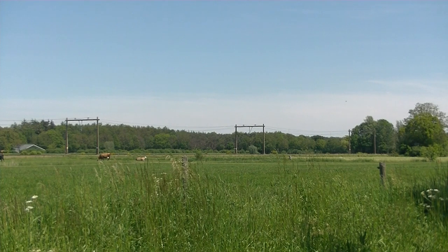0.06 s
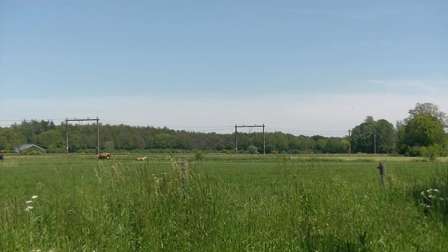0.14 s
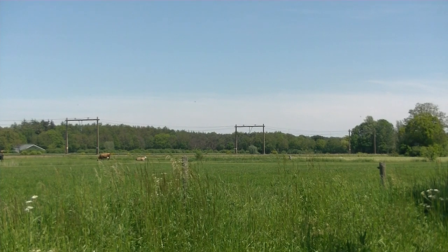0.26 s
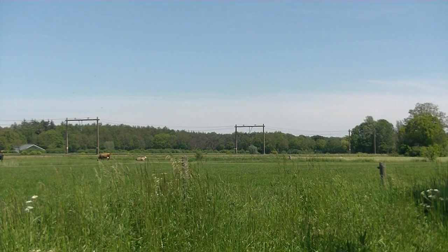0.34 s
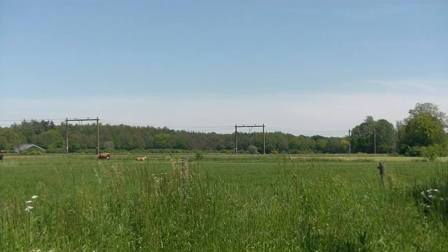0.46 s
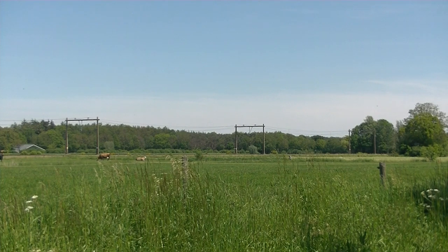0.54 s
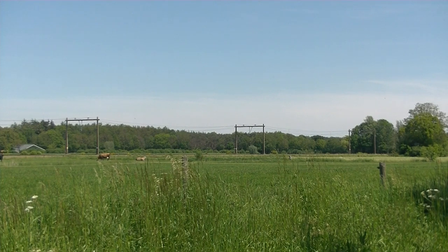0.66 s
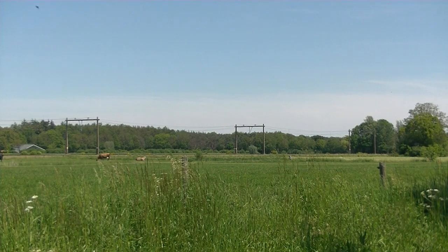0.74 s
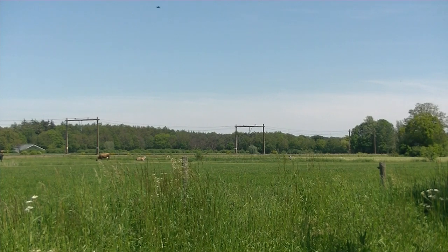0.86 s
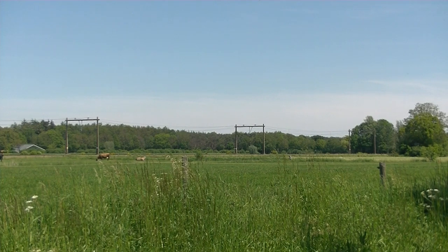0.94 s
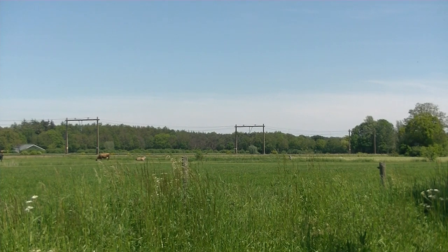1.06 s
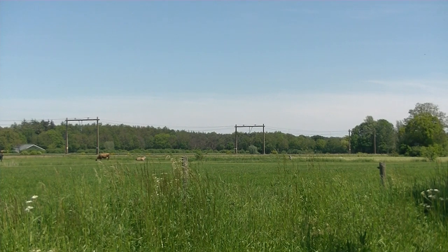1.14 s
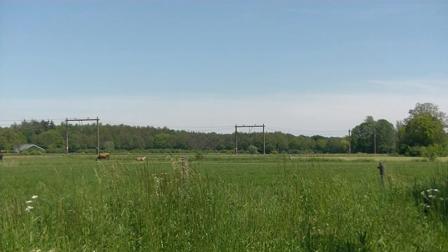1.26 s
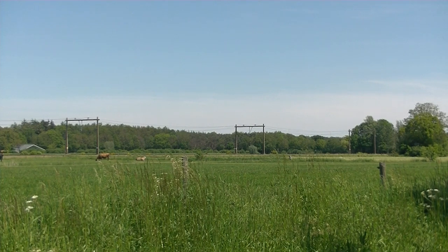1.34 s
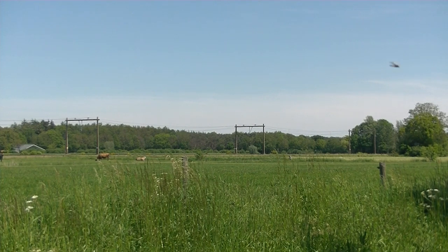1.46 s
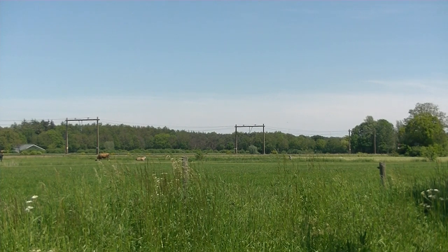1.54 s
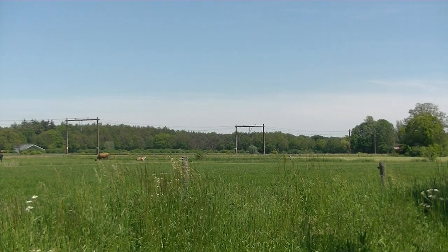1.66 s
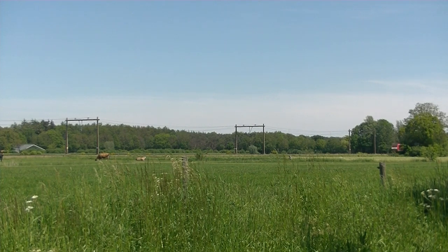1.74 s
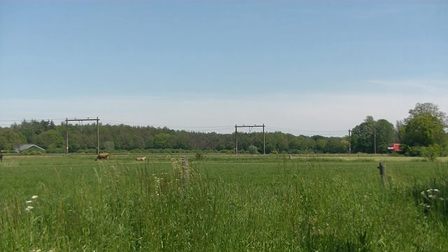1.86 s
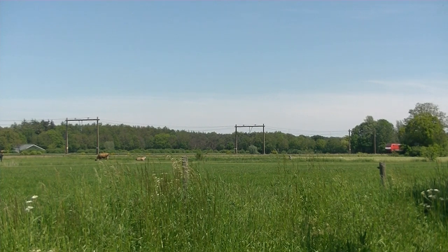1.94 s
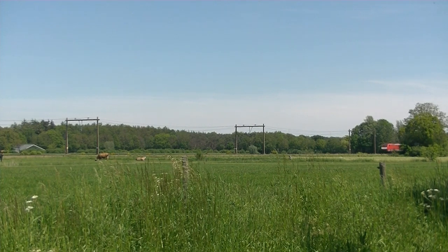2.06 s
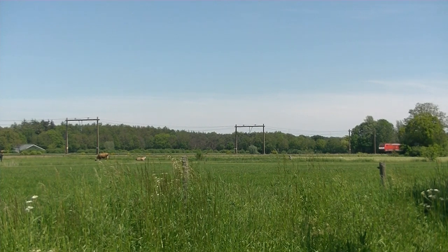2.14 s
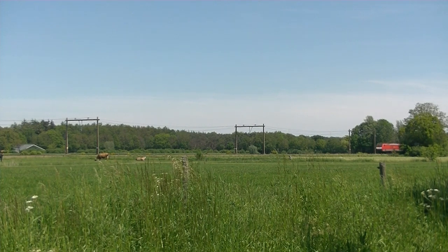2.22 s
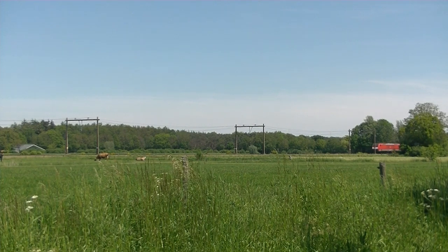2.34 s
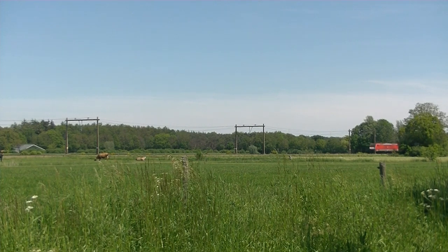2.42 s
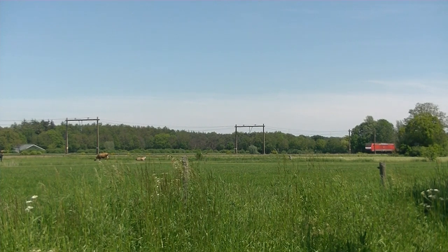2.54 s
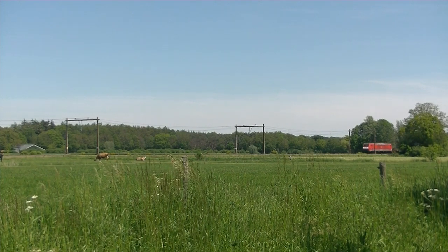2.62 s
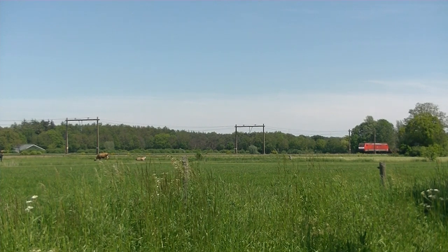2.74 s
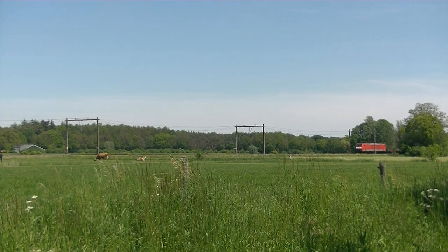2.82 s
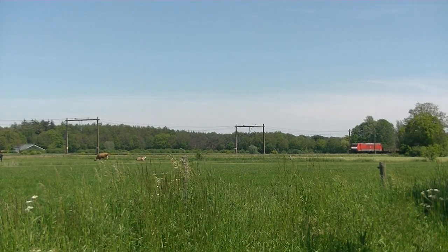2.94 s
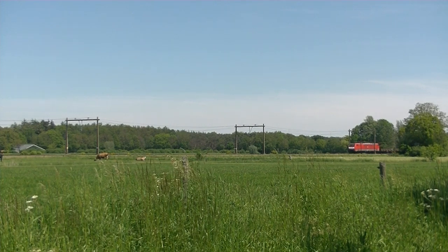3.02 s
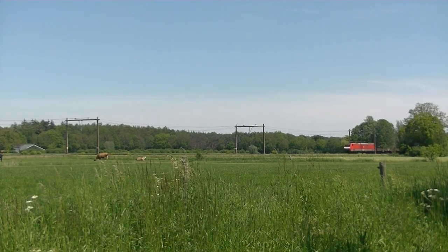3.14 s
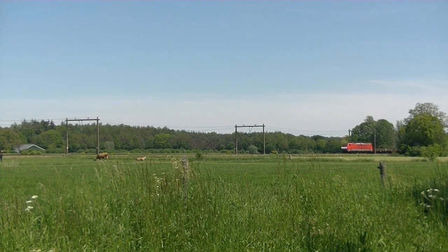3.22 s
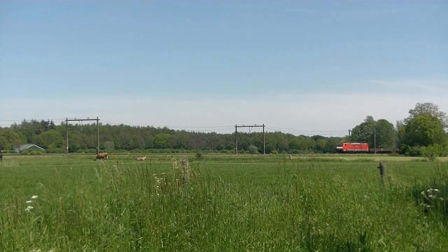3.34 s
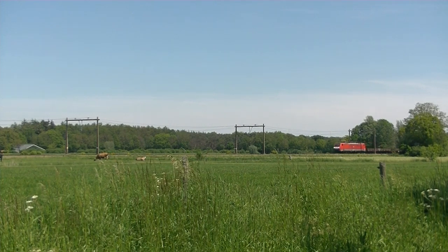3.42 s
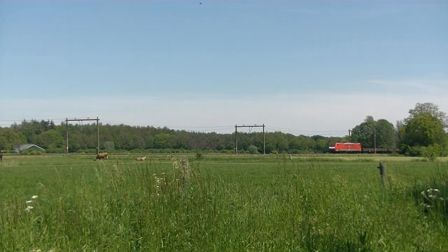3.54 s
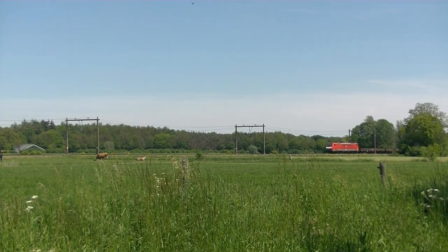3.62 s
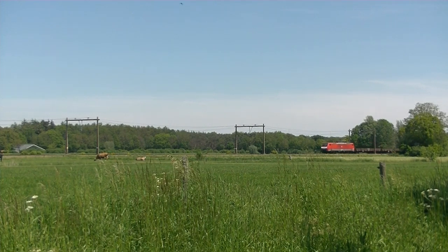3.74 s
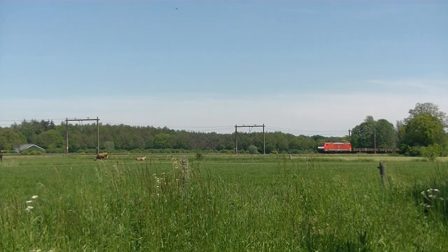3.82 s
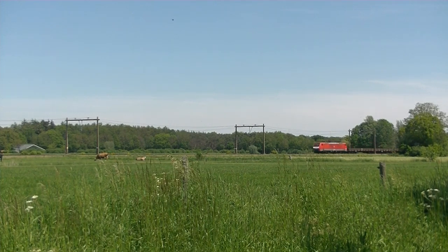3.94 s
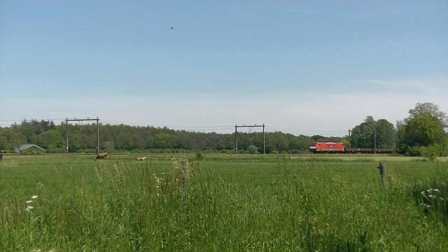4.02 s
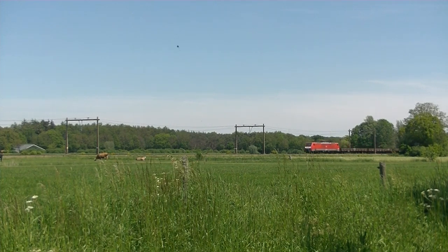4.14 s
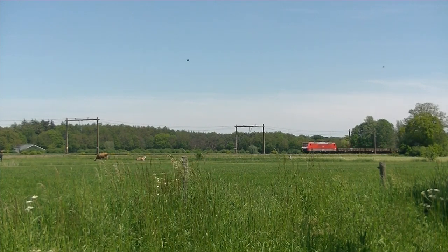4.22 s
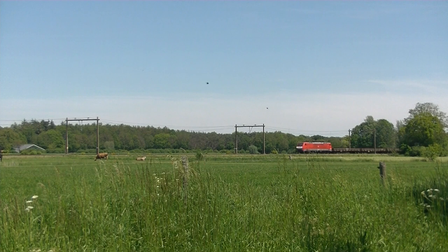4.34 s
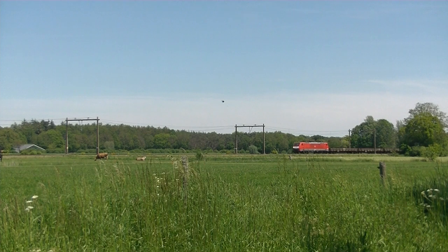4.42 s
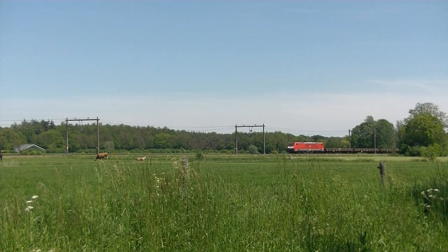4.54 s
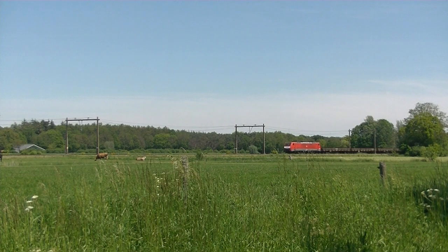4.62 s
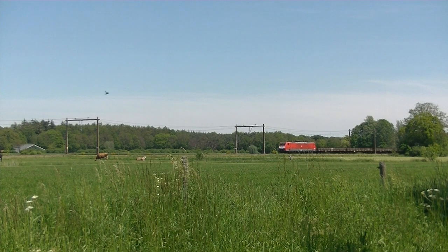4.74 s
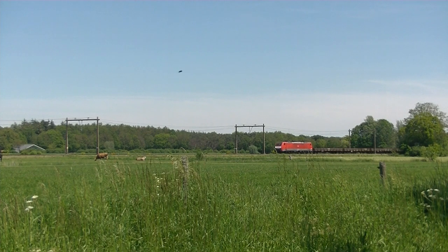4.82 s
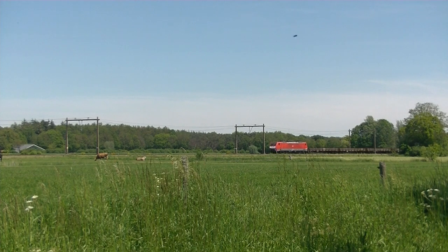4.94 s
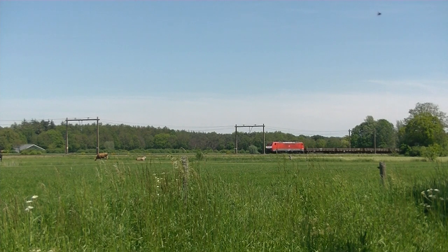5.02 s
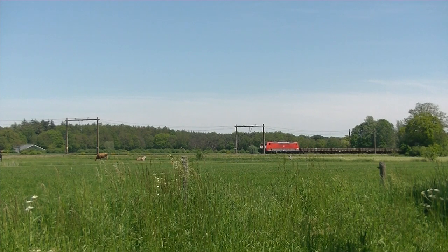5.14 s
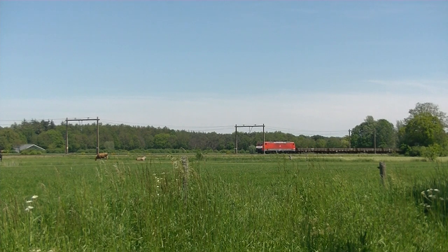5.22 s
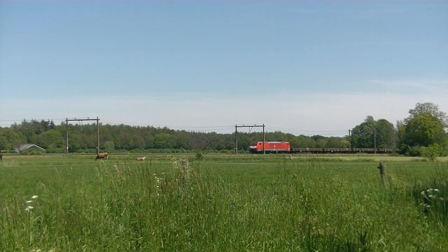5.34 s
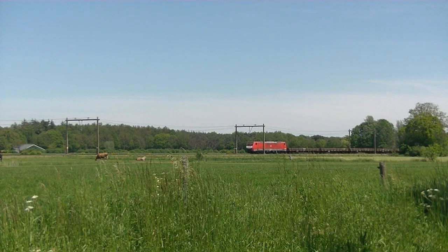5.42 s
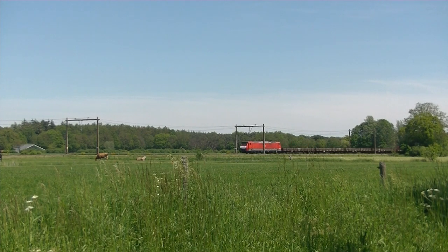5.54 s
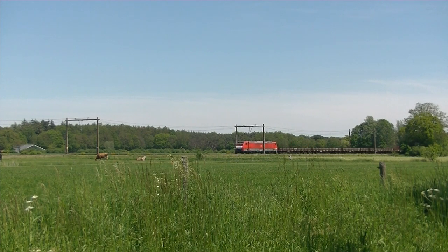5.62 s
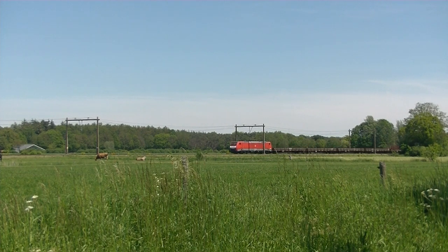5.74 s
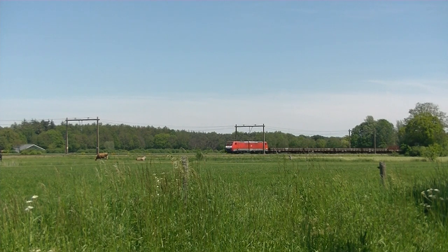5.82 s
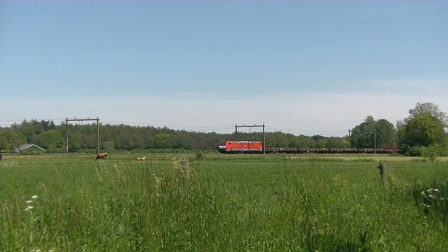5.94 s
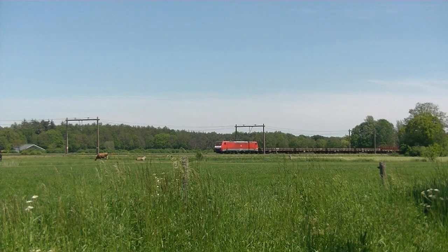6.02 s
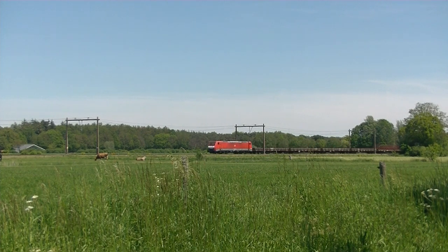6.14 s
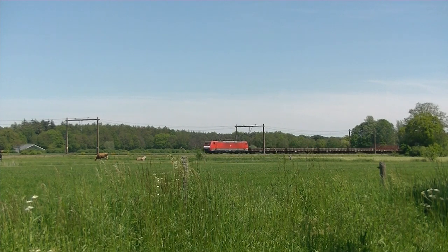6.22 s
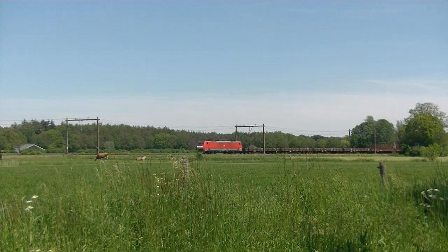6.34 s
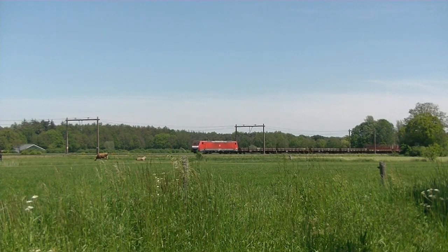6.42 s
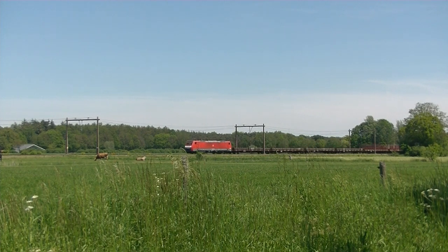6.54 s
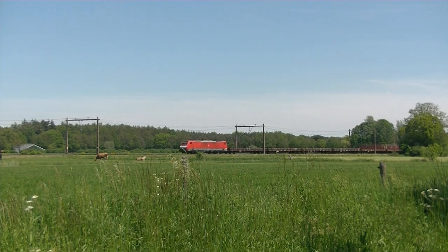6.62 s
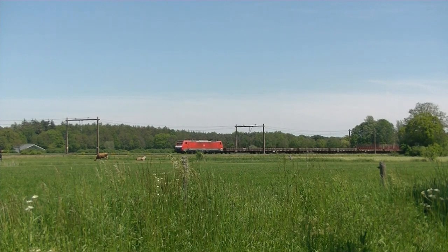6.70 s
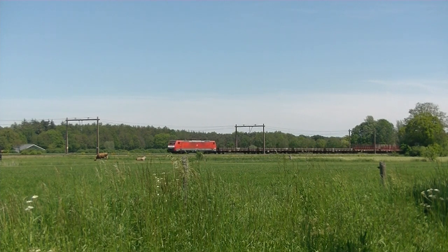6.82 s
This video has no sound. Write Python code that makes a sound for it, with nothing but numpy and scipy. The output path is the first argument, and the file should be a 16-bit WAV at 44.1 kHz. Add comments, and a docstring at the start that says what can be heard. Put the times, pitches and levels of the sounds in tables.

```python
"""The whole scene fades in slowly, from almost nothing at the start to nearly full level at the end.
From the start a freight train rolls past far across a meadow: many steel wheels ring on rough rail, made as
one rush of shaped noise that the air makes waver, with brief squeaks, over a low rumble and faint hiss.
Close by, a camera shutter is released four times, at about 0.9, 1.8, 2.0 and 4.0 s: small blows and a patter
of gear teeth ring the camera body."""
import sys
import numpy as np
from scipy import signal
from scipy.io import wavfile
from scipy.ndimage import uniform_filter1d

SR = 44100
rng = np.random.default_rng(int(sys.argv[2]) if len(sys.argv) > 2 else 0)


def digitize_waveform(pressure):
    """Quantize a signal to 16-bit integers and store it at the path in sys.argv[1].

    Rows of a 2-D input are taken as channels; values are limited to [-1, 1].
    """
    field = np.atleast_2d(pressure).T
    bounded = np.clip(field, -1, 1)
    quanta = np.round(bounded * 32767).astype(np.int16)
    wavfile.write(sys.argv[1], SR, quanta)


N = 302967  # length in samples

# Low rumble and faint hiss. Each row: frequency in Hz, level in dB per Hz before the fade-in.
MEADOW_SPECTRUM = [(25, -114), (34, -110), (42, -102), (60, -101), (110, -91.5), (190, -86.5), (350, -85),
                   (700, -97.5), (3000, -100), (7000, -104), (9000, -107), (14800, -111), (15200, -118),
                   (15450, -135), (20000, -140)]
# The low roll under the rush, strongest at first, while the trees still screen the wheels.
# Each row: time in seconds, gain in dB below the low knee.
LOW_ROLL = [(0, 6), (.3, 3.5), (.7, 3), (1.2, 1.5), (2, 0), (3, -1), (4, -0.5), (5, 1.5), (6, -1.5),
            (6.9, 1)]

# How alike the two microphone ports hear the noise. Each row: frequency in Hz, likeness (1 = the same).
PORT_LIKENESS = [(60, 0.76), (150, 0.48), (380, 0.62), (950, 0.9), (2400, .96), (3500, 0.96), (4500, 1),
                 (5600, 0.94), (7000, 0.91), (9000, 0.99), (15000, 0.93)]
# Balance of the ports. Each row: frequency in Hz, left minus right in dB.
PORT_BALANCE = [(60, -1), (150, -3), (380, -4), (950, 0.5), (2380, 1), (5970, -1), (15000, 3.5)]
# Phase between the ports. Each row: frequency in Hz, lead of the left port in radians.
PORT_LEAD = [(60, 0.15), (340, 0.19), (1030, 0.34), (2670, 0.01), (6000, 0.1)]

# Ways the camera body rings. Each row: frequency in Hz, relative level in dB, time to fall 60 dB in seconds.
BODY_RINGS = [(2960, 12, .004), (3700, 6, .004), (5000, 1, .004), (6640, -3, .005), (7030, 1, .0055),
              (7700, 0, .006), (8250, 4, .0065), (8900, 0, .006), (10400, -3, .006), (11500, -12, .004),
              (13500, -20, .004)]
# Parts of the camera striking their stops. Each row: time in seconds, strength in dB before the body rings.
STOP_TICKS = [(.7012, -46), (.8012, -50), (.8028, -47), (.8052, -47), (.8162, -39.5), (.8188, -44),
              (.8298, -55), (0.8628, -35.5), (.8636, -41), (.8780, -51), (.8955, -43), (.8995, -44),
              (.9028, -51), (.9049, -47), (.9250, -51), (.9436, -54), (1.7330, -49), (1.7372, -41),
              (1.7484, -40), (1.7607, -50), (1.7910, -51), (1.794, -40), (1.7963, -35.5), (1.7988, -42),
              (1.8273, -45), (1.8326, -47), (1.8378, -49), (1.851, -46), (1.9356, -54), (1.9402, -42),
              (1.9505, -45), (1.9522, -46), (1.9633, -47), (1.9909, -51), (1.9937, -41), (1.9964, -37),
              (1.997, -42.5), (1.9995, -46), (2.0341, -54), (2.0517, -52), (2.1108, -48), (3.9542, -43),
              (3.9693, -42), (3.9715, -46), (4.0117, -53), (4.0152, -37), (4.0168, -48), (4.0188, -37.5),
              (4.0252, -51), (4.0496, -55), (4.0556, -57)]
# Releases of the shutter. Each row: mirror slap in seconds, length of the wind-up as a share of the usual.
SHUTTER_RELEASES = [(.8621, 1.01), (1.7936, .98), (1.993, .91), (4.015, 1.01)]
# Gears and springs around each slap. Each row: time from the slap in seconds, level in dB.
GEAR_WHIRR = [(-.066, -85), (-.06, -56), (-.035, -58), (-.025, -85), (-.008, -85), (.002, -52), (.015, -57),
              (.026, -72), (.034, -54), (.08, -60), (.095, -77)]

# Brief rings and squeaks from single wheels. Each row: start in seconds, length in seconds,
# start pitch in Hz, end pitch in Hz, peak level in dB before the fade-in.
WHEEL_SQUEAKS = [(.63, .05, 1340, 1340, -35), (1.675, .05, 2020, 1990, -37), (2.015, .045, 3015, 3015, -37),
                 (2.405, .045, 1810, 1810, -36), (3.205, .04, 3400, 3400, -39),
                 (3.325, .045, 4265, 4265, -38), (3.93, .045, 1990, 2020, -36),
                 (4.15, .06, 2020, 1970, -35), (4.57, .045, 2885, 2885, -38), (4.992, .04, 5900, 6070, -53),
                 (5.155, .04, 4130, 4140, -36), (5.49, .04, 3445, 3445, -38), (4.735, .04, 5280, 5310, -48),
                 (5.085, .03, 5450, 5680, -47), (5.105, .025, 5680, 5560, -48),
                 (5.162, .03, 5960, 6010, -47), (5.195, .025, 5900, 5850, -52),
                 (6.79, .035, 1330, 1150, -34)]

# The rush as the air carries it. Each row: time in seconds, level in dB before the fade-in,
# brightness in dB gained above the treble knee.
RUSH_COURSE = [(0, -28.5, -2), (.15, -34, -0.5), (.6, -35, -1), (.85, -35.5, -1), (1.35, -36, -1.5),
               (1.8, -34.5, 0), (2.1, -33.5, -3), (2.3, -34, -3.5), (2.65, -33.5, -0.5), (2.9, -33, -5),
               (3.2, -33, -2), (3.4, -33.5, -3.5), (3.47, -32.5, -4.5), (3.56, -33, -3.5), (3.8, -34, -2),
               (3.98, -33.5, -5), (4.1, -35, 0.5), (4.18, -32.5, -7), (4.25, -34.5, -2), (4.4, -35, -2),
               (4.55, -35, -5), (4.59, -34, -2), (4.65, -34, -2.5), (4.85, -35.5, 0), (4.94, -35.5, -2.5),
               (5.0, -33, 0), (5.07, -35, 3), (5.135, -34.5, -1.5), (5.178, -35.5, 3), (5.24, -34.5, -1),
               (5.34, -35.5, -2.5), (5.5, -33.5, -5), (5.62, -34.5, -1.5), (5.72, -33.5, -2),
               (5.9, -34, -2.5), (6.1, -33.5, -2.5), (6.34, -34.5, -3), (6.41, -33, -4), (6.47, -34.5, -2),
               (6.55, -34.5, -2), (6.87, -34.5, -1)]
# Colour of rail and wagon noise. Each row: frequency in Hz, relative level in dB per Hz.
ROLLING_COLOUR = [(30, -40), (150, -33.5), (400, -23.5), (700, -15), (1000, -11), (1400, -3.5),
                  (2800, -3.5), (3200, -5), (3500, -4), (4500, -5.5), (4750, -5.5), (5100, -11),
                  (5800, -19), (7000, -26), (8800, -39.5), (11000, -44), (14900, -51), (15400, -67)]
# Wheel and rail resonances. Each row: frequency in Hz, width in Hz, level in dB over the rolling noise.
WHEEL_RINGS = [(176, 22, 13), (462, 16, 9), (490, 18, 7), (968, 24, 5.5), (1040, 50, 0), (1270, 80, 0),
               (1460, 100, -1), (1668, 35, 4.5), (1800, 80, 0), (1990, 100, 2), (2350, 90, 1),
               (2480, 80, 2), (2750, 70, 0), (2893, 25, 5), (2950, 60, 0), (3510, 100, 1), (3880, 100, 0),
               (4080, 80, 0), (4270, 35, 8), (4400, 60, 2.5), (6000, 120, -2)]

LOW_KNEE_HZ, TREBLE_KNEE_HZ = 970, 3180
HARDENING = 0.9  # dB of brightness per dB of blow
RISE_S = 0.0003  # each blow builds up this long
BOUNCE_S, BOUNCE_DB = 0.0025, -11  # each blow rebounds once: average gap, loss
RING_DB = 1.5  # how far each wheel resonance comes and goes
SHIMMER_DB, SURGE_DB = 0.45, 0.3  # depth of the treble's quick wavering, of the rush's short surges
FADE_S, FADE_HEAD_S = 7, 0.029  # length of the whole fade, part of it already over at the start


def gain_of(db):
    """Turns decibels into a factor."""
    return 10 ** (np.asarray(db) / 20)


def evened(x):
    """Scales a signal to an average strength (rms) of 1."""
    return x / np.sqrt(np.mean(x ** 2) + 1e-20)


def read(points, hz):
    """Reads a table between its points, on a log-frequency axis."""
    point_hz, value = np.transpose(points)
    return np.interp(np.log(hz + 1), np.log(point_hz + 1), value)


def wander(frames, count, size):
    """Rows of random drift, rms 1: noise averaged twice over neighbouring frames."""
    rows = rng.standard_normal((count, frames))
    smoother = uniform_filter1d(rows, size=size, axis=1)
    return evened(uniform_filter1d(smoother, size=size, axis=1))


def spectrum_grid():
    """Times of the short-time spectra in seconds, and their frequencies in Hz."""
    return np.arange(N // 256 + 9) * 256 / SR, np.fft.rfftfreq(2048, 1 / SR)


def port_pair(magnitude, hz):
    """Noise of the given short-time magnitude at two partly alike microphone ports."""
    a, b, c, d = rng.standard_normal((4, *magnitude.shape))
    same = np.clip(read(PORT_LIKENESS, hz), -1, 1)[:, None]
    left = a + 1j * b
    # the right port mixes the left port's noise with noise of its own, a little later
    right = same * left + np.sqrt(1 - same ** 2) * (c + 1j * d)
    right = right * np.exp(-1j * read(PORT_LEAD, hz))[:, None]
    tilt = gain_of(read(PORT_BALANCE, hz) / 2)[:, None]
    spectra = np.array([left * tilt, right / tilt]) * magnitude
    return signal.istft(spectra, nperseg=2048, noverlap=1792)[1][:, :N]


def meadow():
    """Low rumble through ground and air, following the roll above 200 Hz, with a faint even hiss."""
    t, hz = spectrum_grid()
    in_roll = (hz[:, None] > 200) * (hz[:, None] < LOW_KNEE_HZ)
    roll_db = in_roll * np.interp(t, *np.transpose(LOW_ROLL))
    drift_db = 0.5 * wander(len(t), count=1, size=30)
    per_hz = np.sqrt(3 * SR / 4096)  # turns level per Hz into short-time magnitude
    return port_pair(per_hz * gain_of(read(MEADOW_SPECTRUM, hz)[:, None] + drift_db + roll_db), hz)


def blows():
    """Times and strengths of all blows: each part hits its stop and rebounds once, more weakly."""
    s, db = np.transpose(STOP_TICKS)
    rebound_s = s + BOUNCE_S * (0.5 + rng.random(len(s)))
    return STOP_TICKS + list(zip(rebound_s, db + BOUNCE_DB))


def camera_blows(crack_db=-22):
    """Each blow sets off fast-dying rings of the camera body and a short crack of noise."""
    t, out = np.arange(700) / SR, np.zeros(N + 700)
    hz, db, t60 = np.transpose(BODY_RINGS)[:, :, None]
    for s, blow_db in blows():
        spread = rng.standard_normal((len(BODY_RINGS), 1))
        place = rng.standard_normal((len(BODY_RINGS), 1))
        noise = rng.standard_normal(len(t))
        hard_db = HARDENING * (blow_db + 41)  # a -41 dB blow is neither hard nor soft
        # a harder blow spreads further from the main ring
        reach_db = hard_db * np.minimum(abs(np.log(hz / 8500)) * 5, 1) + 1.1 * spread
        pitch = hz * (1 + 0.028 * place)  # each part strikes at its own place
        modes = gain_of(db + reach_db - 60 * t / t60) * np.sin(2 * np.pi * pitch * t)
        crack = gain_of(crack_db + 1.5 * hard_db - 60 * t / 0.003) * uniform_filter1d(noise, size=2)
        rise = np.minimum(t / RISE_S, 1)
        out[round(s * SR):][:len(t)] += gain_of(blow_db) * (modes.sum(0) + crack) * rise
    return out[:N]


def gear_whirr(grains_per_s=1500):
    """Gear teeth as noise with random stronger grains, ringing the camera body around each slap."""
    time = np.arange(N) / SR
    offset, whirr_db = np.transpose(GEAR_WHIRR)
    effort = np.zeros(N)
    for slap_s, wind_up in SHUTTER_RELEASES:
        points_s = slap_s + offset * np.where(offset < 0, wind_up, 1)  # stretches only the wind-up
        effort += gain_of(np.interp(time, points_s, whirr_db, -200, -200))
    grains = rng.random(N) < grains_per_s / SR
    teeth = rng.standard_normal(N) * (0.24 + grains * 3)
    t = np.arange(700) / SR
    hz, db, t60 = np.transpose(BODY_RINGS)[:, :, None]
    body = (gain_of(db - 60 * t / t60) * np.sin(2 * np.pi * hz * t)).sum(0)
    return signal.oaconvolve(evened(teeth) * effort, body / np.linalg.norm(body))[:N]


def shutter():
    """Blows and whirr together, thinned because a small body sends out no bass."""
    small = signal.butter(2, [1800, 15000], "band", fs=SR)  # Hz
    near = signal.lfilter(*small, camera_blows() + gear_whirr())
    far_side = np.roll(near, shift=6) - near  # swaps a share of the sound for a copy 6 samples later
    return np.array([near + 0.2 * far_side, near]) * gain_of([[-0.3], [0.3]])  # a little to the right


def squeaks():
    """Single wheels: short tones with soft ends, most of them steady or gliding a little."""
    out = np.zeros(N)
    for s, length_s, start_hz, end_hz, db in WHEEL_SQUEAKS:
        hz = np.linspace(start_hz, end_hz, round(length_s * SR))
        tone = np.sin(2 * np.pi * np.cumsum(hz) / SR)
        out[round(s * SR):][:len(hz)] += gain_of(db) * np.hanning(len(hz)) * tone
    return out


def train(patchy_db=0.5, flutter_db=0.5, glint_db=1.06):
    """Rolling noise with wheel resonances that come and go as different wagons dominate."""
    t, hz = spectrum_grid()
    frames, bins, column = len(t), len(hz), hz[:, None]
    s, level_db, bright_db = np.transpose(RUSH_COURSE)
    centre, width, db = np.transpose(WHEEL_RINGS)

    shapes = 1 / (1 + (2 * (column - centre) / width) ** 2)
    ring_db = db[:, None] + RING_DB * wander(frames, count=len(db), size=12)
    rings = shapes @ gain_of(ring_db) ** 2  # power over the rolling noise

    patches = evened(uniform_filter1d(wander(frames, count=bins, size=7), size=14, axis=0))
    glints = evened(uniform_filter1d(wander(frames, count=bins, size=6), size=3, axis=0))  # brief, narrow
    low = 1 / (1 + (column / LOW_KNEE_HZ) ** 4)
    treble = 1 / (1 + (TREBLE_KNEE_HZ / (column + 1)) ** 4)
    # turbulence on the long path shakes the upper bands together and lets them surge
    flutter = (1 - low) * wander(frames, count=1, size=4)
    surge = (1 - low) * wander(frames, count=1, size=5)
    waver_db = patchy_db * patches + glint_db * glints + flutter_db * flutter + SURGE_DB * surge

    shimmer_db = SHIMMER_DB * wander(frames, count=1, size=6)
    treble_db = treble * (np.interp(t, s, bright_db) + shimmer_db)
    roll_db = low * (column > 200) * np.interp(t, *np.transpose(LOW_ROLL))
    colour_db = read(ROLLING_COLOUR, hz)[:, None] + treble_db + roll_db
    colour = gain_of(colour_db) * np.sqrt(1 + rings)
    rush = evened(port_pair(colour * gain_of(waver_db), hz))
    return rush * gain_of(np.interp(np.arange(N) / SR, s, level_db))


def scene():
    """Train, squeaks, meadow and shutter together."""
    return train() + squeaks() + meadow() + shutter()


def band_limit(x):
    """A steep low-pass at the top of the band."""
    return signal.sosfilt(signal.butter(12, 15350, fs=SR, output="sos"), x)


def record(dry):
    """Fades the whole scene in along a straight line."""
    fade = (np.arange(N) / SR + FADE_HEAD_S) / FADE_S
    return band_limit(dry * fade)


dry = scene()
out = record(dry)
digitize_waveform(out)
```